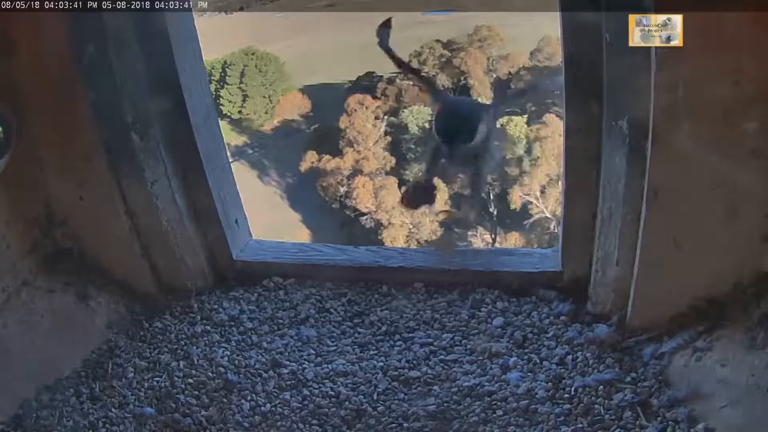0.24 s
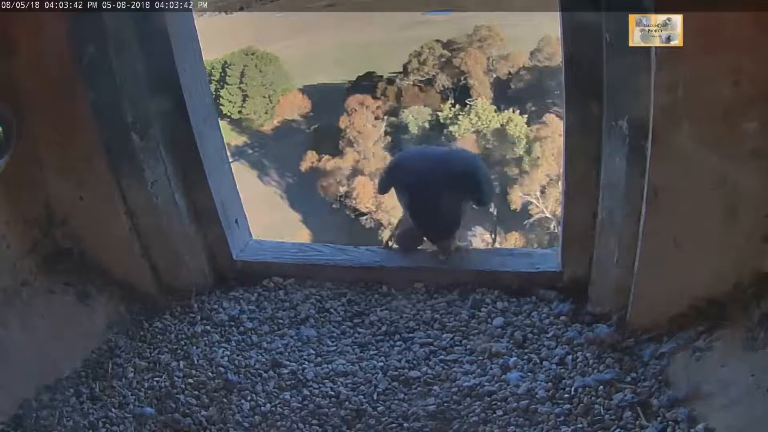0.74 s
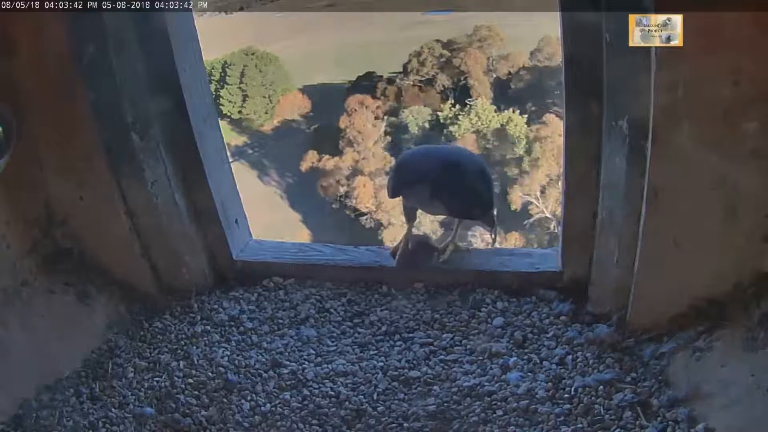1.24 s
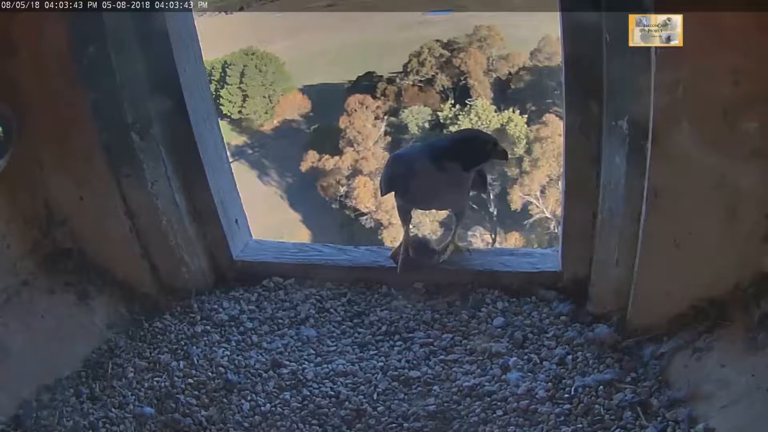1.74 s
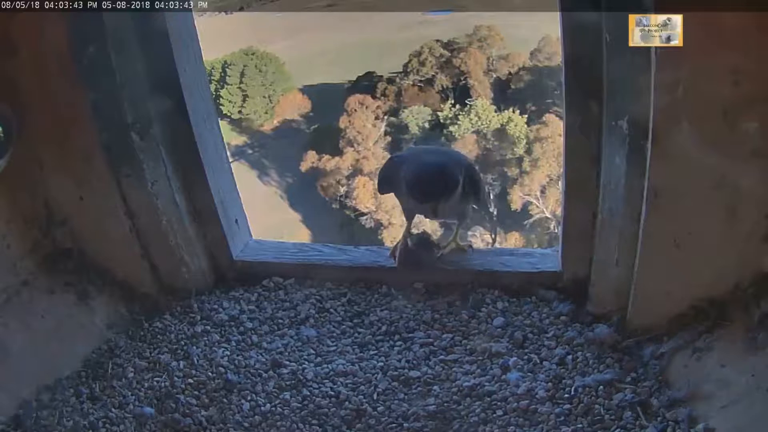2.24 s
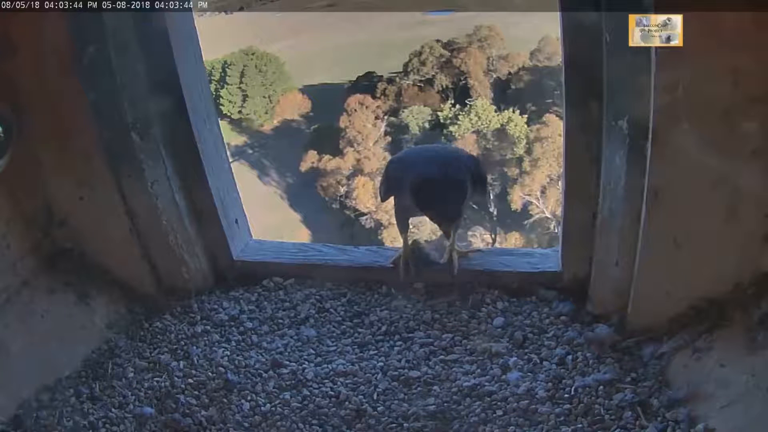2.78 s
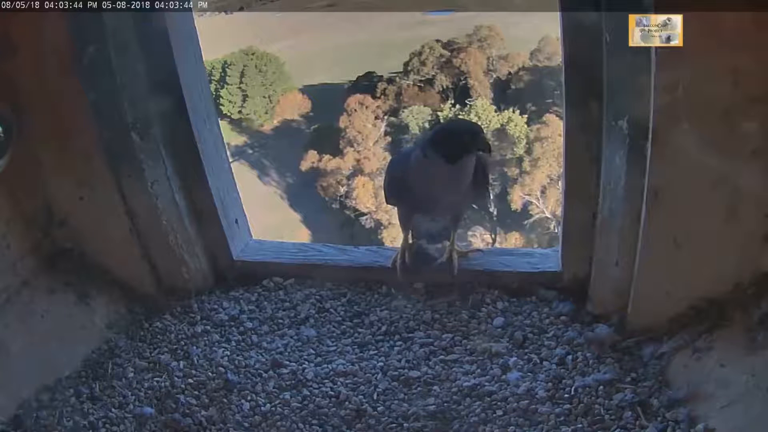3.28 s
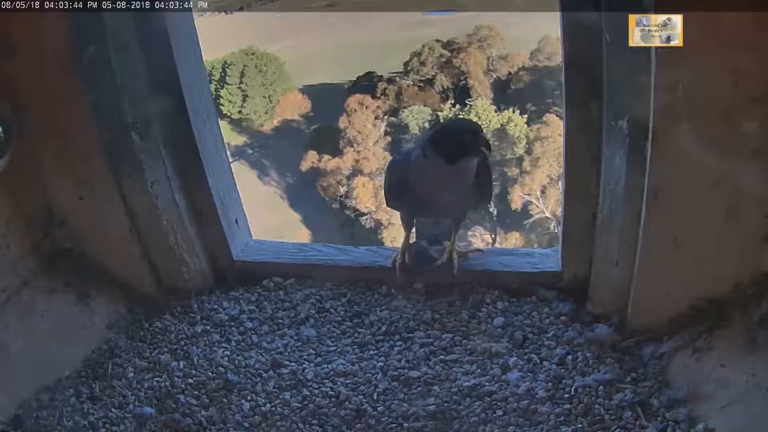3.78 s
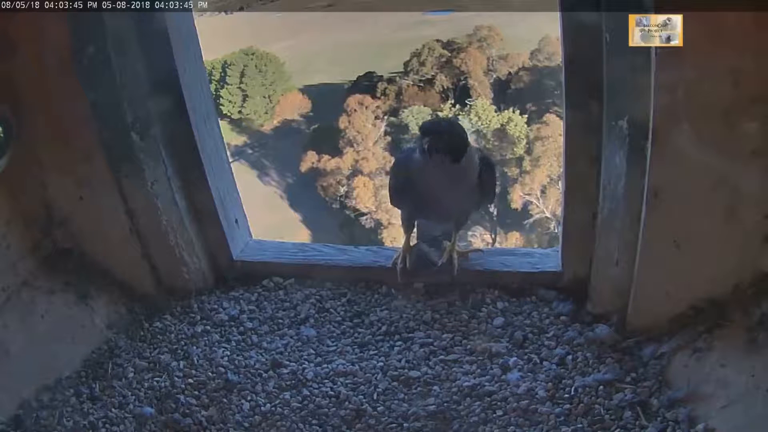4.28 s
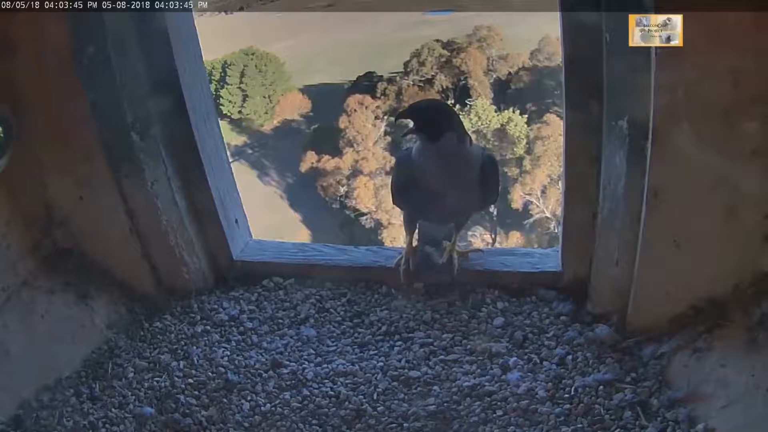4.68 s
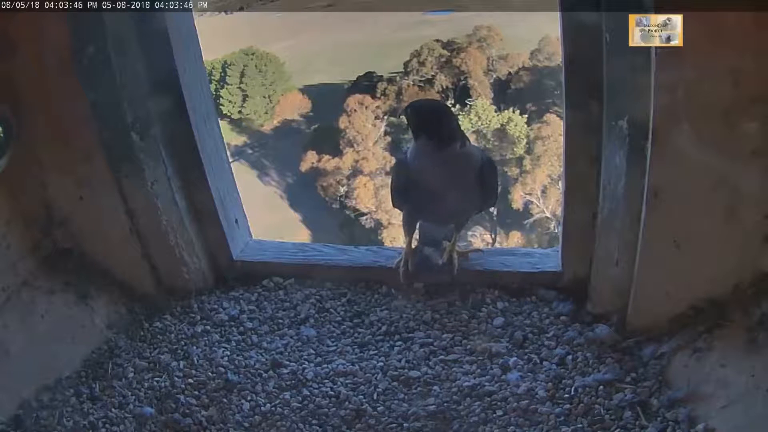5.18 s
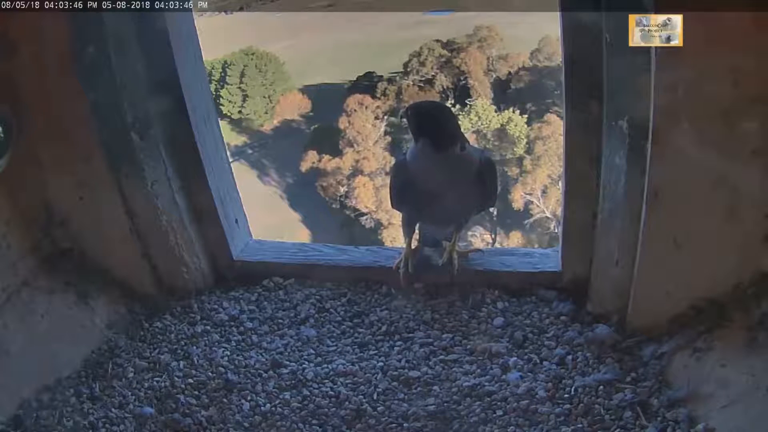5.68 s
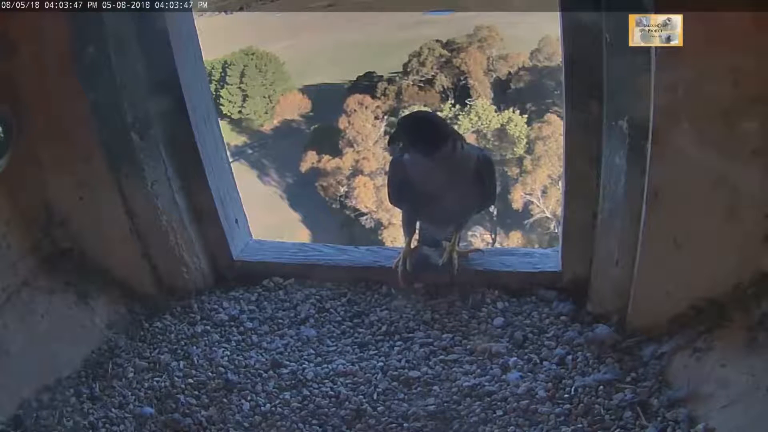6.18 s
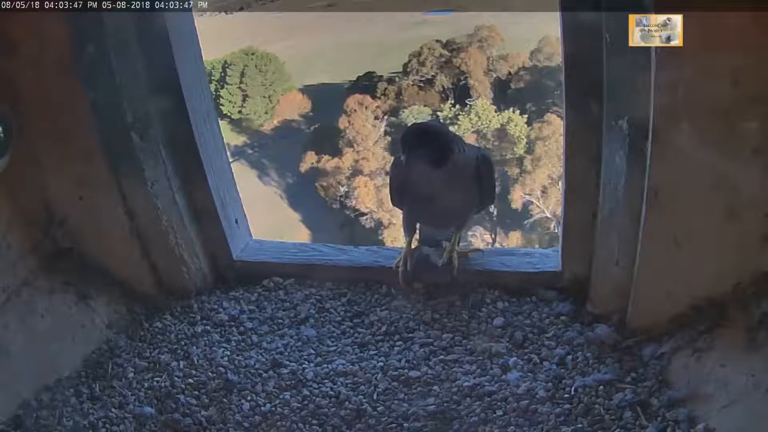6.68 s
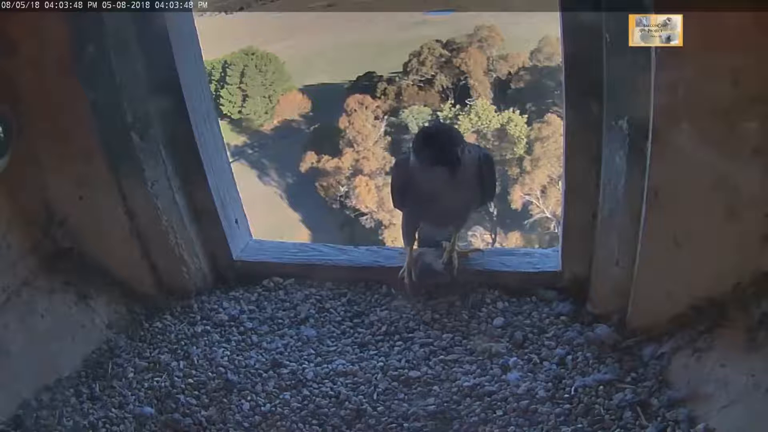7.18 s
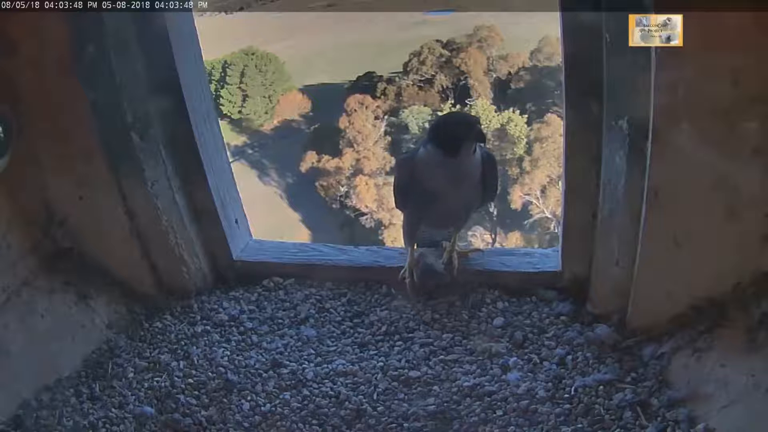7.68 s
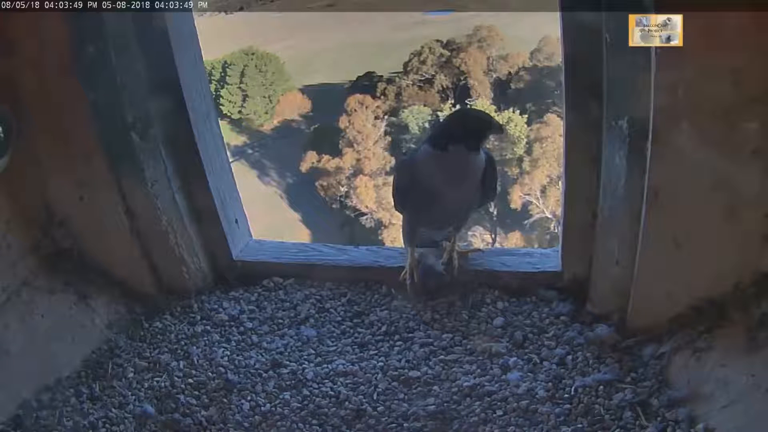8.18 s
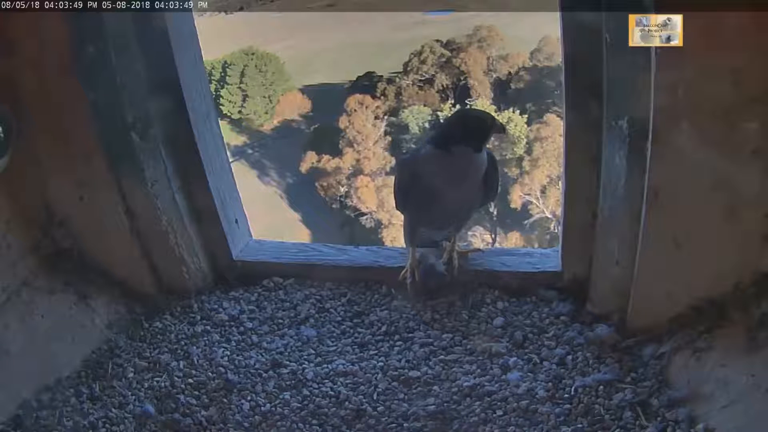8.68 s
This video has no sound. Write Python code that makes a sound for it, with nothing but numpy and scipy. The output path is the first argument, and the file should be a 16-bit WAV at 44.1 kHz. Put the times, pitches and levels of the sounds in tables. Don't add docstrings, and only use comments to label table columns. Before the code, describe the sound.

Soft wing pulses end in a solid foot thud on wood, and at once a loud sharp chup rings out. The falcon keeps calling in short, separate bursts: thin piercing whistles breaking into chups and throaty clucks, and croaks climbing into creaky notes. Everything is near, narrow-band and coloured by a wooden box, with a weak outdoor echo behind and quiet rumble and hiss throughout.

```python
import sys
import numpy as np
from scipy import signal
from scipy.fft import rfft, irfft, next_fast_len
from scipy.io import wavfile
from scipy.ndimage import uniform_filter1d, map_coordinates

SR = 44100
rng = np.random.default_rng(int(sys.argv[2]) if len(sys.argv) > 2 else 0)


def unload_audio(sound):
    columns = np.transpose(np.atleast_2d(sound))
    steps = np.round(np.clip(columns, -1, 1) * 32767)
    wavfile.write(sys.argv[1], SR, steps.astype(np.int16))


def field_ratio(decibels):
    return 10 ** (np.asarray(decibels, dtype=float) / 20)


N = 393870

CHUP_MULTIPLES = [1, 2, 3, .5, 1.5, 2.5]
CHUP_BEND = 0.65


def along(points, hz):
    f, v = np.transpose(points)
    return np.interp(np.log(hz + 1), np.log(f + 1), v)


def unit(x):
    return x / np.sqrt(np.mean(x ** 2) + 1e-20)


def filtered(x, response):
    m = next_fast_len(len(x) + 8192)
    spectrum = rfft(x, m) * response(np.fft.rfftfreq(m, 1 / SR))
    return irfft(spectrum, m)[:len(x)]


def wobble(rate, count):
    knots = rng.standard_normal(int(count * rate / SR) + 4)
    return map_coordinates(knots, [np.arange(count) * rate / SR])


def add(track, s, sound):
    part = track[round(s * SR):][:len(sound)]
    part += sound[:len(part)]


def resonance(f, center, width):
    return 1j * f * width / (center * center - f * f + 1j * f * width)


def dips(f):
    # f/Hz, width/Hz, depth (0-1)
    gaps = [(776, 410, 0.8), (1984, 380, 0), (4900, 100, 0.98)]
    return np.prod([1 - np.clip(depth, 0, 1) * resonance(f, c, w) for c, w, depth in gaps], axis=0)


def box(f):
    # f/Hz, width/Hz, level/dB
    modes = [(1230, 158, -0.5), (1649, 77, -0.5), (2460, 290, -3.5), (3069, 102, 2), (3570, 250, -5.5),
             (4770, 300, -1.5), (5655, 280, -3), (6700, 400, -1)]
    return dips(f) * sum((-1) ** k * field_ratio(db) * resonance(f, c, w) for k, (c, w, db) in enumerate(modes))


def sharpened_box(f, extra):
    ring = box(f)
    return ring * abs(ring) ** extra


def air():
    # t/s, rumble level/dB, box boom level/dB
    gusts = [
        (0.0, -61.5, -74),
        (0.501, -53, -71),
        (0.769, -58.5, -66.5),
        (1.561, -62.5, -69),
        (8.008, -66.5, -73.5),
        (8.93, -62.5, -70.5),
    ]
    # f/Hz, level/dB per Hz
    rumble_tone = [(4.7, -40.5), (8.0, -7), (16, -10.5), (27, -23.5), (54, -13.5), (130, -37.5),
                   (170, -87.5), (290, -120)]
    # f/Hz, level/dB per Hz
    boom_tone = [(65, -5.5), (110, -10.5), (195, 2.5), (319, -15), (565, -24), (633, -26.5), (685, -40.5),
                 (900, -30), (1170, -71), (1980, -120)]
    # f/Hz, level/dB per Hz
    hiss_tone = [(350, -42), (600, -4.5), (794, -6), (1930, -9.5), (3680, -13.5), (5980, -4.5), (7920, -19),
                 (10300, -45), (17400, -120)]

    def noise(shape):
        return unit(filtered(rng.standard_normal(N), shape))

    s, rumble_db, boom_db = np.transpose(gusts)
    t = np.arange(N) / SR
    rumble_level = field_ratio(np.interp(t, s, rumble_db) + 2 * wobble(6, N))
    rumble = rumble_level * noise(lambda f: field_ratio(along(rumble_tone, f)))
    boom_level = field_ratio(np.interp(t, s, boom_db) + 1.5 * wobble(8, N))
    boom = boom_level * noise(lambda f: field_ratio(along(boom_tone, f)))
    hiss_level = field_ratio(-80 + 0.37 * wobble(8.7, N))
    hiss = hiss_level * noise(lambda f: field_ratio(along(hiss_tone, f)) * (0.5 + 1.4 * abs(box(f))))
    return rumble + boom + hiss


def sill_knocks():
    # t/s, thud level/dB, scratch level/dB, T60/s
    contacts = [
        (.003, -68, -41.5, 0.1),
        (0.633, -80, -49.5, 0.13),
        (0.642, -38, -62, 0.11),
        (.68, -47, -51, 0.11),
        (2.911, -51, -84, 0.16),
    ]
    thud, scratch = np.zeros(N), np.zeros(N)
    t = np.arange(SR // 4) / SR
    for s, thud_db, scratch_db, t60 in contacts:
        modes = sum(field_ratio(rng.normal(0, 1.5)) * np.sin(2 * np.pi * hz * t) for hz in (195, 265))
        soft_onset = 1 - np.exp(-t / 0.011)
        add(thud, s, field_ratio(thud_db - 60 * t / t60) * soft_onset * modes)
        add(scratch, s, field_ratio(scratch_db - 60 * t / t60) * rng.standard_normal(len(t)))
    return thud + filtered(scratch, lambda f: box(f) / (1 + (f / 3000) ** 2))


def wing_beats():
    # t/s, pressure (full scale 1), width/s
    strokes = [
        (0.245, -0.0065, 0.0053),
        (0.376, -0.013, 0.0044),
        (0.395, .015, 0.0044),
        (0.483, -0.012, 0.0052),
        (.507, 0.0093, 0.0037),
        (.622, -0.012, 0.005),
        (0.704, -0.0045, 0.0028),
        (.72, 0.0083, 0.0029),
        (.732, -0.0059, 0.0033),
    ]
    t = np.arange(N) / SR
    return sum(size * np.exp(-0.5 * ((t - s) / width) ** 2) for s, size, width in strokes)


def phrased(events, partials, multiples, bend, waver_db, waver_rate, colour):
    tables = []
    u = np.linspace(0, 1, num=24)
    for s, length, first_hz, last_hz, db, octave_db in events:
        pitch = first_hz * (last_hz / first_hz) ** (u ** bend)
        levels = []
        for k, (top_db, attack, hold, under, ends) in zip(multiples, partials):
            peak_db = db + top_db + max(np.log2(k), 0) * octave_db
            waver = waver_db * map_coordinates(rng.standard_normal(size=40), [u * length * waver_rate])
            ring_db = colour * 20 * np.log10(abs(box(k * pitch)) + 0.08)
            corners = np.clip([0, attack / length, (attack + hold) / length, 1], 0, [0, 0.9, 0.95, 1])
            levels.append(peak_db + waver + ring_db - np.interp(u, corners, [under, 0, 0, ends]))
        tables.append(np.transpose([s + u * length, pitch, *levels]))
    return tables


def sung(tables, multiples, rough, rasp_db):
    fade = 0.0018
    tone, rasp = np.zeros(N), np.zeros(N)
    for rows in tables:
        s, pitch, *levels = np.transpose(rows)
        t = np.arange(s[0] - fade, s[-1] + fade, 1 / SR)
        edge = np.clip(np.minimum(t - t[0], t[-1] - t) / (2 * fade), 0, 1) ** 2
        fluttering = np.interp(t, s, pitch) * (1 + 0.004 * wobble(300, len(t)))
        phase = 2 * np.pi * np.cumsum(fluttering) / SR
        sizes = [field_ratio(uniform_filter1d(np.interp(t, s, db), size=200)) * edge for db in levels]
        for k, size in zip(multiples, sizes):
            shaky = size * (1 + rough * wobble(500, len(t)))
            add(tone, t[0], np.sqrt(2) * shaky * np.sin(k * phase + k))
        breath = field_ratio(rasp_db + 2.5 * wobble(200, len(t))) * sum(sizes)
        add(rasp, t[0], breath * rng.standard_normal(len(t)))
    return tone + filtered(rasp, lambda f: sharpened_box(f, 0.6))


def throaty(events, start_hz, end_hz, bend, buzz_peak, low_peak, gain_db):
    low, buzz = np.zeros(N), np.zeros(N)
    for s, db, low_db, rasp_db, length in events:
        u = np.arange(0, 1, 1 / (SR * length))
        pitch = start_hz * (end_hz / start_hz) ** (u ** bend) * (1 + 0.05 * wobble(199.4, len(u)))
        phase = 2 * np.pi * np.cumsum(pitch) / SR

        def swell(peak):
            return np.sin(np.pi * u ** (np.log(0.5) / np.log(np.clip(peak, 0.05, 0.95)))) ** 2

        pulses = sum(np.cos(k * phase) / (1 + (k / 3.04) ** 2) for k in np.arange(2, 20))
        puffs = (1 + np.cos(phase)) ** 2
        rasp = field_ratio(rasp_db + 5.0 + 2.3 * wobble(250, len(u))) * puffs * rng.standard_normal(len(u))
        add(buzz, s - 0.003, field_ratio(db + gain_db) * swell(buzz_peak) * (pulses + rasp))
        low_level = field_ratio(db + low_db + 4.5 * wobble(150, len(u))) * swell(low_peak) ** 0.41
        add(low, s - 0.003, low_level * (np.cos(phase) + 0.11 * np.cos(2 * phase)))
    return filtered(low, dips) + filtered(buzz, lambda f: sharpened_box(f, 0.4))


def whistles():
    # t/s, length/s, first f/Hz, last f/Hz, level/dB
    sighs = [
        (0.711, 0.038, 4950, 5240, -44),
        (1.117, .042, 4380, 4590, -43),
        (3.193, 0.06, 4780, 4770, -42),
        (3.629, 0.04, 4180, 4370, -43.5),
        (5.003, 0.011, 3860, 3840, -44),
        (5.022, 0.065, 3956, 4280, -49.5),
        (5.996, 0.014, 3760, 3740, -52.5),
        (6.014, 0.022, 3940, 4090, -49),
        (6.04, 0.017, 4320, 4450, -53.5),
    ]
    # t/s, length/s, first f/Hz, last f/Hz, level/dB
    swells = [
        (1.738, 0.065, 3920, 4450, -49.5),
        (2.257, 0.073, 3820, 4420, -46.5),
        (3.66, .04, 4280, 4990, -42),
        (4.457, 0.063, 3990, 4680, -49.5),
        (6.79, .06, 4500, 4900, -42),
        (7.514, .036, 4330, 4900, -49),
        (8.762, 0.048, 4130, 4700, -50),
        (7.555, 0.035, 6500, 6800, -64),
        (2.782, .02, 4500, 4000, -56),
    ]
    # t/s, length/s, first f/Hz, last f/Hz, level/dB
    snaps = [
        (0.773, 0.019, 5150, 3680, -38.5),
        (1.798, 0.013, 3800, 3550, -37.5),
        (7.589, 0.026, 5130, 3664, -32.5),
    ]
    # peak level/dB, attack/s, hold/s, start drop/dB, end drop/dB
    sigh_partials = [(0, 0.005, .005, 9, 8), (-25, .015, .005, 9, 3)]
    # peak level/dB, attack/s, hold/s, start drop/dB, end drop/dB
    swell_partials = [(0, 0.04, .006, 6, 3.5), (-22, .045, .005, 10.5, 3)]
    # peak level/dB, attack/s, hold/s, start drop/dB, end drop/dB
    snap_partials = [(0, .002, 0.017, 3, 9), (-29, .011, .003, 5.2, 16)]
    multiples = [1, 1.5]

    def glides(rows):
        return [(*row, 0) for row in rows]

    thin = phrased(glides(swells), swell_partials, multiples, bend=0.9, waver_db=3.0, waver_rate=95, colour=0.05)
    thin += phrased(glides(sighs), sigh_partials, multiples, bend=0.9, waver_db=2.0, waver_rate=80, colour=0.05)
    thin += phrased(glides(snaps), snap_partials, multiples, bend=0.33, waver_db=1.5, waver_rate=57, colour=0.22)
    return sung(thin, multiples, rough=0.2, rasp_db=-4)


def chups():
    # peak t/s, peak f/Hz, level/dB, brightness/dB per octave, half-pitch level/dB
    plain = [
        (1.168, 2500, -42.5, 6.5, -8),
        (1.809, 2300, -46, 6, 4),
        (2.334, 2410, -36, 3, -12),
        (3.257, 2460, -32.5, -5.5, 3),
        (3.710, 2460, -33, -1, -10),
        (4.526, 2375, -37.5, 2.5, 0),
        (5.09, 2220, -48, 5.5, -3),
        (6.061, 2385, -43, -2.5, -8),
        (6.855, 2450, -33, -2, 6),
        (8.827, 2384, -38, -4, 8),
    ]
    # peak t/s, peak f/Hz, level/dB, brightness/dB per octave, half-pitch level/dB
    snapped = [
        (0.795, 2450, -29, -2, -10),
        (7.610, 2590, -30, -1, -10),
    ]
    # peak level/dB, attack/s, hold/s, start drop/dB, end drop/dB
    plain_partials = [(0, 0.012, 0.0026, 18, 18), (2, .011, 0.0033, 15, 30), (-8, 0.013, 0.0026, 36, 27),
                      (-13, 0.0065, 0.0021, 6.2, 26), (-22, 0.01, 0.0036, 12, 15),
                      (-19.5, 0.0076, 0.0036, 12, 6.8)]
    # peak level/dB, attack/s, hold/s, start drop/dB, end drop/dB
    snapped_partials = [(0, .006, .004, 16, 20), (0, .005, .003, 16, 36), (-24, .01, .002, 30, 14),
                        (-11, .02, .004, 6, 6), (-20, .01, .004, 12, 9), (-14, .008, .004, 12, 12)]
    half_pitch = np.array([0, 0, 0, 0, 0, 1, 1, 1])
    # rise/s, fall/s, then first and last pitch over the peak pitch
    kinds = [(plain, plain_partials, 0.012, 0.019, 1.06, 0.94),
             (snapped, snapped_partials, 0.007, 0.03, 1.04, 0.965)]
    tables = []
    for rows, partials, rise, fall, above, sinks in kinds:
        events = [(s - rise, rise + fall, hz * above, hz * sinks, db, octave_db) for s, hz, db, octave_db, _ in rows]
        stacks = phrased(events, partials, CHUP_MULTIPLES, CHUP_BEND, waver_db=2.2, waver_rate=130, colour=0.45)
        tables += [stack + row[-1] * half_pitch for stack, row in zip(stacks, rows)]
    return sung(tables, CHUP_MULTIPLES, rough=0.28, rasp_db=-5.5)


def clucks():
    # t/s, buzz level/dB, fundamental level/dB, rasp level/dB, length/s
    events = [(0.8042, -44.5, -8, -7, 0.042), (1.1832, -30.5, -15, -46, 0.045),
              (1.8223, -28.5, -16.5, -14, 0.033), (2.3444, -28.5, -17, -31.5, 0.044),
              (3.2646, -30.5, -15.5, -39, 0.041), (3.7255, -33.5, -13.5, -34.5, 0.046),
              (4.5381, -30, -16.5, -24, 0.046), (5.0978, -34, -15.5, -18.5, 0.043),
              (6.0728, -37, -16.5, -40, 0.046), (6.8727, -32.5, -14.5, -45, 0.052),
              (7.6209, -32, -13, -35, 0.044), (8.8381, -30, -17.5, -34, 0.048)]
    return throaty(events, start_hz=626, end_hz=179.0, bend=0.62, buzz_peak=0.21, low_peak=0.45, gain_db=0.5)


def croaks():
    # t/s, buzz level/dB, fundamental level/dB, rasp level/dB, length/s
    openers = [
        (1.0626, -24.5, -21.5, -30.5, 0.039),
        (2.6886, -23.5, -23, -31, 0.023),
        (4.115, -21, -29, -33.5, 0.044),
        (6.4654, -26, -26.5, -27.5, 0.041),
        (7.3304, -33, -20.5, -36, 0.031),
        (8.3526, -23, -26, -42.5, 0.033),
    ]
    # t/s, buzz level/dB, fundamental level/dB, rasp level/dB, length/s
    lone = [
        (5.473, -27.5, -27, -27, .082),
    ]
    out = throaty(openers, start_hz=266.0, end_hz=640.4, bend=0.61, buzz_peak=0.28, low_peak=0.34, gain_db=-3.0)
    return out + throaty(lone, start_hz=340, end_hz=680, bend=0.7, buzz_peak=0.26, low_peak=0.2, gain_db=-3.5)


def creaky_notes():
    # t/s, length/s, first f/Hz, last f/Hz, level/dB
    events = [
        (1.088, .036, 1100, 1078, -43),
        (2.704, 0.067, 1231, 1121, -29),
        (3.146, .04, 1230, 1155, -42.5),
        (4.134, 0.042, 1230, 1020, -32),
        (6.480, 0.049, 1214, 1060, -33),
        (7.348, 0.058, 1283, 1160, -32.5),
        (8.372, 0.045, 1230, 1014, -33),
    ]
    # peak level/dB, attack/s, hold/s, start drop/dB, end drop/dB
    partials = [(-2, .013, .019, 3.1, 26), (-26.5, 0.0064, 0.0064, 3.5, 19.4), (-23, 0.0093, .02, 6, 12),
                (-19.5, .012, 0.014, 10, 9.1), (-14, .016, 0.012, 31, 23), (-24.5, .02, 0.012, 19, 26)]
    multiples = [1, 2, 3, 4, 5, 6]
    rows = [(*row, 0) for row in events]
    full = phrased(rows, partials, multiples, bend=1.4, waver_db=1.5, waver_rate=90, colour=0.12)
    return sung(full, multiples, rough=0.011, rasp_db=-16)


def grunts():
    # t/s, buzz level/dB, fundamental level/dB, rasp level/dB, length/s
    events = [
        (2.240, -40.5, -5.5, -37, 0.025),
        (3.141, -37, -9.5, -30.5, 0.023),
        (3.609, -43.5, -6, -30.5, 0.022),
        (4.991, -44, -8, -34, 0.029),
    ]
    return throaty(events, start_hz=252.0, end_hz=427.4, bend=0.65, buzz_peak=0.19, low_peak=0.43, gain_db=2)


def pips():
    # t/s, length/s, f/Hz, level/dB, brightness/dB per octave
    events = [(2.762, 0.039, 2810, -42.5, -2), (3.619, .034, 2463, -42, -12), (4.178, 0.022, 2500, -45, 2),
              (4.483, 0.017, 2470, -52, -3), (5.067, .022, 2487, -46.5, -12),
              (6.528, .024, 2514, -49, -1.5), (6.779, 0.02, 2485, -54, -5.5),
              (7.399, 0.017, 2752, -49.5, -5), (8.416, .024, 2482, -52, -13.5), (8.79, .018, 2450, -54, -9),
              (3.665, .022, 2460, -50, -12)]
    # peak level/dB, attack/s, hold/s, start drop/dB, end drop/dB
    partials = [(0, 0.0077, 0.0044, 20, 12), (0, .007, .001, 14, 26)]
    rows = [(s, length, hz, hz * 0.98, db, octave_db) for s, length, hz, db, octave_db in events]
    short = phrased(rows, partials, CHUP_MULTIPLES, CHUP_BEND, waver_db=1.5, waver_rate=49, colour=0.041)
    return sung(short, CHUP_MULTIPLES, rough=0.065, rasp_db=-4.0)


def falcon():
    return whistles() + chups() + clucks() + croaks() + creaky_notes() + grunts() + pips()


def echo(x, decays, delay):
    hz, t, z = signal.stft(rng.standard_normal(int(1.5 * SR)), SR, nperseg=256)
    decay = field_ratio(-60 * t / along(decays, hz)[:, None])
    tail = signal.istft(z * decay, SR, nperseg=256)[1]
    tail *= 1 - np.exp(-np.arange(len(tail)) / (SR * delay))
    return signal.fftconvolve(x, tail / np.linalg.norm(tail))[:N]


def box_ring(voice):
    inside = filtered(voice, lambda f: 0.59 + 0.36 * abs(box(f)))
    return field_ratio(-6) * echo(inside, [(300, 0.078), (6000, 0.052)], delay=0.003)


def land_echo(voice):
    # f/Hz, T60/s
    decays = [(200, 2), (1000, 0.76), (2700, 2.3), (5000, 0.45), (7300, 0.92)]
    # f/Hz, level/dB
    tone = [(300, -5), (1800, -7), (5000, 1), (7000, -2)]
    back = filtered(voice, lambda f: field_ratio(along(tone, f)) * (0.73 + 0.63 * abs(box(f))))
    return field_ratio(-17) * echo(back, decays, delay=0.025)


def scene():
    voice = falcon()
    landing = sill_knocks() + wing_beats()
    return (air() + landing + voice + box_ring(voice) + land_echo(voice))[None]


def top_cut(x):
    return signal.sosfilt(signal.butter(12, 8070, fs=SR, output="sos"), x)


def record(dry):
    # f/Hz, level/dB
    mic_top = [(6500, 3), (7200, -1), (7700, -20), (8300, -63), (9500, -80)]
    x = filtered(dry[0], lambda f: field_ratio(along(mic_top, f)))
    x = x + field_ratio(-92) * rng.standard_normal(N) + 0.0138
    return top_cut(x[None])


dry = scene()
out = record(dry)
unload_audio(out)
```